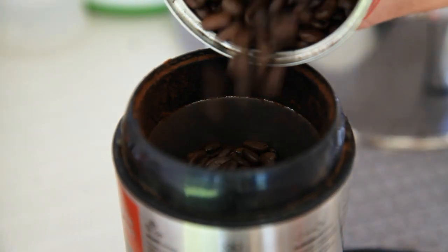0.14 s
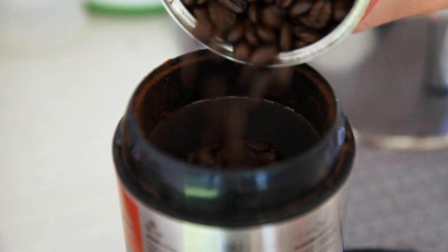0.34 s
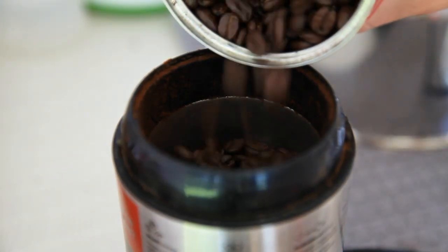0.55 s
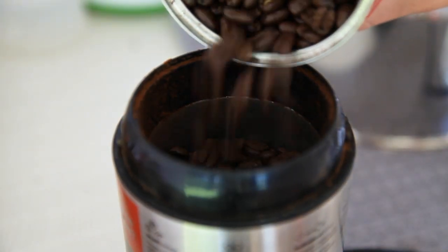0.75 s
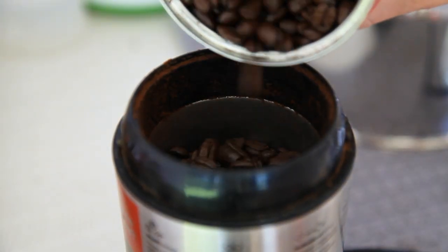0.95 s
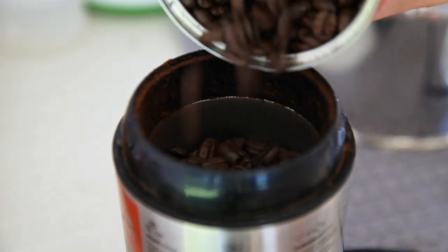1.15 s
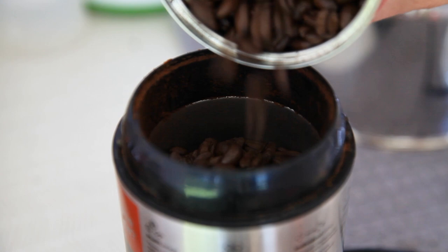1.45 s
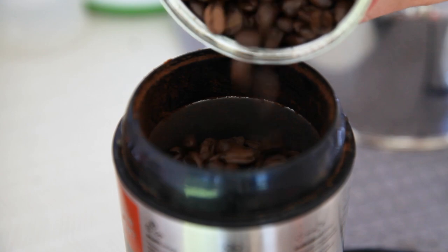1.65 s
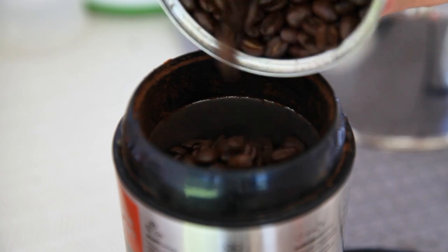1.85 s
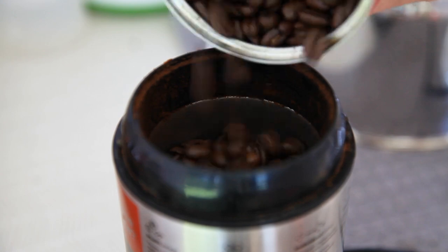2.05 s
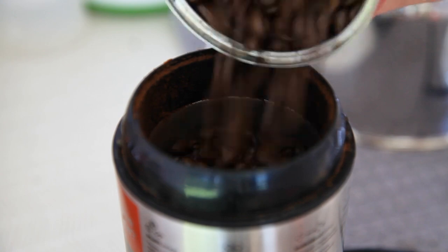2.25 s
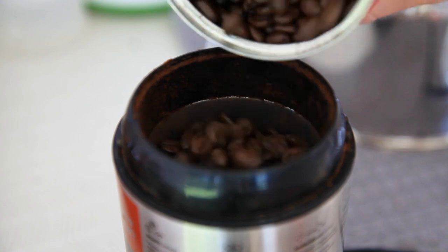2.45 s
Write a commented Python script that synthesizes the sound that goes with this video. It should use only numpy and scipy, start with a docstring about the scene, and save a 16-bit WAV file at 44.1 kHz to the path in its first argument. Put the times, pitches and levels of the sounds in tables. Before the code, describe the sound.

Close up in a quiet kitchen, coffee beans stream and bounce into a steel cup in uneven surges, with brief glassy scrapes, dull low bumps midway, and one tiny hollow knock near the end.

```python
"""Roasted coffee beans clack and rattle from a glass jar into a grinder's steel cup, close by in a kitchen.
Each bean is a noise crunch plus dying modes of its shell, the heap's hollow and the cup; shells tick.
Rough noise slides over the lip drive the jar's modes; random small impacts make the patter.
Midway come low thuds, decaying sines with puffs and rumble; later one small hollow knock.
Reflections follow the beans; a mains hum and faint room noise lie underneath."""
import sys
import numpy as np
from scipy import signal
from scipy.io import wavfile
from scipy.ndimage import uniform_filter1d

SR = 44100
rng = np.random.default_rng(int(sys.argv[2]) if len(sys.argv) > 2 else 0)


def output_pcm(signal):
    """Save a mono or channel-first signal as 16-bit PCM at the path in sys.argv[1].

    Samples are clipped to [-1, 1] before scaling.
    """
    pcm = np.clip(np.atleast_2d(signal).T, -1, 1) * 32767
    wavfile.write(sys.argv[1], SR, np.round(pcm).astype(np.int16))


N = 114660

# modes of the glass jar: freq_hz, relative_level_db, t60_s
JAR_MODES = [(2457, 0.5, 0.096), (2502, -7, 0.11), (3460, -7, 0.15), (5240, -7.5, 0.072),
             (7540, -2.5, 0.15), (9830, -5, 0.042)]
SHELL_HZ, TICK_HZ = (2650, 7550), (8200, 13500)  # ranges of bean and tick pitch
CONTACT_RISE_S = 0.00019
EDGE_HZ = 15900  # top of the recorded band


def landings():
    """Each loud bean grazes a neighbour, lands and bounces once, on both heap and cup."""
    # loud beans, before trims: start_s, heap_clack_level_db, cup_ring_level_db
    loud_beans = [(0.0408, -33.0, -50.0), (0.113, -33, -29.0), (0.1374, -29.5, -25), (0.146, -31.5, -25),
                  (0.1983, -31.5, -29), (0.2094, -28, -26), (0.2352, -31.5, -39), (0.407, -31.5, -26.5),
                  (0.4316, -27, -35.0), (0.4475, -30, -21.5), (0.4538, -30.5, -24), (0.5008, -30, -22.0),
                  (0.5256, -41, -30), (0.5444, -29.5, -48.0), (0.5801, -27, -49.0), (0.6271, -27, -19.5),
                  (0.723, -24.5, -45), (0.7515, -55, -30.5), (0.7572, -47, -32.5), (0.7785, -42, -35),
                  (0.7978, -34, -45.0), (0.8216, -40, -46.0), (0.8325, -26, -46), (0.864, -56, -34.0),
                  (0.8909, -38, -30.0), (0.8989, -36.5, -33), (0.9157, -31.5, -32), (0.9595, -49.5, -31),
                  (1.0203, -30.5, -26), (1.024, -49, -29.5), (1.0571, -43.0, -31), (1.0922, -37, -34),
                  (1.103, -35.5, -35.0), (1.1206, -37, -37.0), (1.1644, -33.5, -27.5), (1.1742, -26, -30),
                  (1.1772, -32, -27), (1.1945, -34, -40), (1.2021, -33, -36), (1.2282, -30, -26.5),
                  (1.271, -34.5, -27), (1.2945, -23.5, -26), (1.3236, -27.5, -24), (1.3501, -35, -30),
                  (1.3785, -32.5, -27), (1.4197, -34, -24), (1.452, -34, -36.0), (1.483, -29.5, -29),
                  (1.5165, -34.5, -30.5), (1.5365, -36, -29.5), (1.5508, -29, -45), (1.5577, -32.0, -22.5),
                  (1.6204, -32, -40.0), (1.6384, -38, -23.5), (1.647, -40, -27), (1.676, -31, -36),
                  (1.7473, -36.5, -59), (1.8337, -35, -32.5), (1.8726, -30, -30.5), (1.8914, -41, -30),
                  (1.9752, -33, -28), (1.9892, -31.5, -30.5), (2.0222, -30.5, -29), (2.1347, -33.5, -38),
                  (2.1397, -44, -26), (2.147, -32.0, -26), (2.2161, -27, -41), (2.249, -36.5, -22.5),
                  (2.2545, -48.0, -26), (2.2646, -34.5, -20), (2.281, -26, -28.0), (2.2958, -41.0, -30),
                  (2.307, -31.0, -27.0), (2.3178, -29, -41.0), (2.382, -33, -35), (2.4238, -30, -20.0),
                  (2.4267, -28.5, -25), (2.5444, -34.5, -58.0), (2.57, -43, -38)]
    clack_trim_db, cup_trim_db, decay_s = -2, -3.5, 0.0057
    graze_lead_s, graze_db = (0.002, 0.006), -17.5
    bounce_delay_s, bounce_db = (0.0027, 0.011), -10.5
    out = np.zeros(N)
    for start_s, clack_db, cup_db in loud_beans:
        graze = (-rng.uniform(*graze_lead_s), graze_db)
        bounce = (rng.uniform(*bounce_delay_s), bounce_db)
        for offset_s, db in [graze, (0, 0), bounce]:
            heap_hit = clack(decay_s, rng.uniform(*SHELL_HZ))
            add(out, start_s + offset_s, amp(clack_db + clack_trim_db + db) * heap_hit)
            add(out, start_s + offset_s, amp(cup_db + cup_trim_db + db) * ping())
    return out


def clack(decay_s, shell_hz):
    """One bean: a crunch, the brief resonances of its own shell and the answer of the hollow."""
    # contact spectrum: freq_hz, relative_density_db
    contact_spectrum = [(200, -9.5), (800, -33), (1200, -10.5), (1600, -19.5), (2200, -6.5), (2900, -1),
                        (4200, -2), (5300, 3), (7000, -0.5), (8500, 0), (10500, -12.5), (13300, -15),
                        (16000, -25.5)]
    # resonances of the hollow above the heap: freq_hz, relative_level_db, t60_s
    hollow_modes = [(3530, -4, 0.05), (5370, -2, 0.051), (6270, 2, 0.041)]
    shell_t60_s, overtone_db, scatter_db = 0.015, -9.5, -9
    shell_share, hollow_share = 0.35, 0.36
    shell_modes = [(shell_hz, 0, shell_t60_s)]
    for ratio in rng.uniform(0.703, 1.393, size=2):
        shell_modes.append((shell_hz * ratio, overtone_db, shell_t60_s))
    shell = unit(ring(shell_modes, detune=0, vary_db=8, size=1500), size=220)
    hollow = unit(ring(hollow_modes, detune=0.0073, vary_db=7, size=1500), size=220)
    crunch = unit(burst(decay_s, contact_spectrum, CONTACT_RISE_S, scatter_db), size=220)
    return unit(crunch + shell_share * shell + hollow_share * hollow, size=220)


def ping():
    """One bean on the steel cup: dying modes behind a soft contact rise."""
    # modes of the steel cup: freq_hz, relative_level_db, t60_s
    cup_modes = [(7846, 1.5, 0.045), (7460, -5.5, 0.016), (8010, 2.5, 0.012), (8110, -13.5, 0.065),
                 (8450, -6, 0.005)]
    steel = unit(ring(cup_modes, detune=0.0083, vary_db=2.5), size=220)
    return steel * (1 - np.exp(-seconds(size=6000) / CONTACT_RISE_S))


def burst(decay_s, spectrum, rise_s, scatter_db):
    """An uneven crunch of contact and its duller scatter inside the grinder's mouth."""
    lump_db, scatter_top_hz, scatter_decay_s = 1.5, 9800, 0.0083
    t = seconds(size=1500)
    lumps = amp(lump_db * unit(uniform_filter1d(rng.standard_normal(len(t)), size=24)))
    crunch = rng.standard_normal(len(t)) * lumps * np.exp(-t / decay_s)
    lowpass = signal.butter(2, scatter_top_hz, fs=SR)
    dull_noise = signal.lfilter(*lowpass, rng.standard_normal(len(t)))
    scatter = dull_noise * amp(scatter_db) * np.exp(-t / scatter_decay_s)
    return colour((1 - np.exp(-t / rise_s)) * (crunch + scatter), spectrum)


def ticks():
    """Sharp shell contacts between the landings."""
    # brittle shells glancing off each other, before trim: start_s, level_db
    glances = [(0.0278, -32.5), (0.0684, -28.5), (0.306, -28), (0.314, -25), (0.4656, -42), (0.6252, -28),
               (1.0338, -27.0), (1.0874, -30.5), (1.1201, -32), (1.134, -34.5), (1.2246, -29.5),
               (1.2617, -29.0), (1.2788, -28), (1.282, -28), (1.296, -43), (1.3116, -29), (1.6232, -29.5),
               (1.763, -41.5), (1.9068, -31), (2.02, -31), (2.058, -30), (2.0803, -32.5), (2.254, -23.5),
               (2.2963, -29.5), (2.382, -30), (2.3932, -28)]
    trim_db = -2
    out = np.zeros(N)
    for start_s, db in glances:
        add(out, start_s, amp(db + trim_db) * tick(rng.uniform(*TICK_HZ)))
    return out


def tick(hz):
    """Two brittle shells glance off each other and ring for an instant."""
    # contact spectrum: freq_hz, relative_density_db
    tick_spectrum = [(300, -46.5), (1200, -6.5), (3000, -4), (6000, 2), (10000, 4.5), (13500, 2),
                     (16000, -6)]
    shell_t60_s, shell_share = 0.0047, 0.44
    shell = unit(ring([(hz, 0, shell_t60_s)], detune=0, vary_db=0, size=1500), size=88)
    contact = unit(burst(0.00069, tick_spectrum, rise_s=0.00008, scatter_db=-9.5), size=88)
    return unit(contact + shell_share * shell, size=88)


def scrapes(load_detune=0.005):
    """Short rough slides drive the jar's modes; beans lying on the glass detune it each time."""
    # slides over the glass lip, before jar and grit trims: start_s, level_db
    slides = [(0.117, -40), (0.147, -44), (0.189, -42), (0.256, -41.5), (0.31, -39), (0.367, -45.5),
              (0.476, -46.5), (0.507, -57), (0.752, -47.5), (1.282, -39), (1.312, -46.5), (1.452, -44),
              (1.553, -43.5), (1.948, -41), (2.002, -39), (2.131, -43), (2.168, -42.5), (2.255, -39.5),
              (2.319, -43), (2.498, -44)]
    # grit spectrum: freq_hz, relative_density_db
    grit_spectrum = [(300, -79), (1800, -8), (3300, 15), (4300, -12), (5600, 3), (8000, 11.5), (11000, -6),
                     (16000, -19)]
    width_s, rise_s = 0.0063, 0.0017
    jar_trim_db, grit_trim_db = -3, -1.5
    out, t = np.zeros(N), seconds(size=5000)
    push = np.minimum(t / rise_s, 1) * np.exp(-(t / width_s) ** 2 / 2)
    for start_s, db in slides:
        slips = push * rng.standard_normal(len(t))
        glass = np.zeros(len(t))
        for mode in JAR_MODES:
            # same spread in Hz for every mode
            mode_ring = ring([mode], detune=load_detune * JAR_MODES[0][0] / mode[0], vary_db=0)
            driven = signal.fftconvolve(slips, mode_ring)[:len(t)]
            glass += amp(mode[1]) * unit(driven, size=700)
        grit = unit(colour(slips, grit_spectrum), size=700)
        add(out, start_s, amp(db) * (amp(jar_trim_db) * glass + amp(grit_trim_db) * grit))
    return out


def patter():
    """Jostling beans: random heap, cup, jar and shell impacts follow the stream's strength."""
    # stream strength, before layer trims: time_s, clatter_level_db, treble_level_db
    stream = [(0, -41.5, -42), (.1, -40.5, -54), (.21, -33.5, -44), (.46, -32.5, -39.5), (.6, -38.5, -47.5),
              (.81, -41, -45.5), (.95, -43.5, -56), (.985, -43.5, -64), (1.111, -42, -39.5),
              (1.15, -43.5, -54), (1.31, -46, -57), (1.4, -43.5, -48.5), (1.66, -41.5, -48.5),
              (1.81, -48.5, -54), (2.01, -53, -51), (2.1, -41.5, -46.5), (2.3, -39, -49),
              (2.46, -44, -60.5), (2.6, -59, -42)]
    heap_trim_db, cup_trim_db, shell_trim_db, jar_trim_db = -2.5, -6, 1.5, -11.5
    decay_s = 0.0011
    time_s, clatter_db, treble_db = np.transpose(stream)
    heap = shower(lambda: clack(decay_s, rng.uniform(*SHELL_HZ)), per_s=600, spread_db=5.5)
    cup = shower(ping, per_s=120, spread_db=7.5)
    shells = shower(lambda: tick(rng.uniform(*TICK_HZ)), per_s=300, spread_db=12)
    jar = shower(lambda: ring(JAR_MODES, detune=0.005, vary_db=8.0), per_s=110, spread_db=5, count=20)
    clatter = amp(heap_trim_db) * heap + amp(cup_trim_db) * cup + amp(jar_trim_db) * jar
    treble = amp(shell_trim_db) * shells
    return level(np.c_[time_s, clatter_db]) * clatter + level(np.c_[time_s, treble_db]) * treble


def shower(make, per_s, spread_db, count=120):
    """Many small impacts of random size at random moments, scaled to rms 1."""
    out, sounds = np.zeros(N), [make() for _ in range(count)]
    gain = amp(spread_db * np.minimum(rng.exponential(1, N), 2.5))
    for i in np.flatnonzero(rng.random(N) < per_s / SR):
        add(out, i / SR, gain[i] * sounds[i % count])
    return unit(out)


def bumps(t60_s=0.12, rise_s=0.0034):
    """Low decaying swings, each with a dull puff, amid a rumble of coloured noise."""
    # low bumps, before the soft rise: start_s, level_db, pitch_hz
    thuds = [(1.239, -32, 48.3), (1.267, -24, 62.4), (1.298, -21.5, 57), (1.398, -16, 59),
             (1.452, -30, 52.5), (1.581, -26.5, 44.6), (2.278, -39.5, 72)]
    # rumble around the bumps: time_s, rms_level_db
    rumble_curve = [(0, -71), (1.22, -63), (1.305, -26.5), (1.37, -42), (1.405, -27.5), (1.49, -44),
                    (1.6, -46), (1.75, -47.5), (1.84, -69)]
    # rumble spectrum: freq_hz, relative_density_db
    rumble_spectrum = [(20, 0.5), (60, -3.5), (120, -7.5), (260, -29.5), (1200, -63.5)]
    # puff spectrum: freq_hz, relative_density_db
    puff_spectrum = [(130, 5), (260, 8), (380, -9), (900, -61)]
    puff_db, puff_decay_s = -18, 0.017
    out = level(rumble_curve) * unit(colour(rng.standard_normal(N), rumble_spectrum, size=8192))
    t = seconds(size=12000)
    for start_s, db, hz in thuds:
        swing = -amp(-60 * t / t60_s) * np.sin(2 * np.pi * hz * t)
        puff_noise = unit(colour(rng.standard_normal(len(t)), puff_spectrum))
        puff = amp(puff_db) * np.exp(-t / puff_decay_s) * puff_noise
        add(out, start_s, amp(db) * (1 - np.exp(-t / rise_s)) * (swing + puff))
    return out


def knock():
    """One small hollow knock: a decaying sine whose pitch snaps down as it sounds."""
    start_s, level_db, t60_s, rise_s = 2.2703, -25.5, 0.019, 0.00055
    final_hz, drop_hz, drop_decay_s = 494, 505, 0.00074
    out, t = np.zeros(N), seconds(size=2000)
    hz = final_hz + drop_hz * np.exp(-t / drop_decay_s)
    envelope = amp(level_db - 60 * t / t60_s) * (1 - np.exp(-t / rise_s))
    add(out, start_s, envelope * np.sin(2 * np.pi * np.cumsum(hz) / SR))
    return out


def echoes(x, delay_s=0.003, size=22050):
    """Dense kitchen reflections: a noise tail, each band dying at its own speed."""
    # ring of the kitchen: freq_hz, t60_s
    room_t60 = [(2500, 0.33), (8000, 0.14), (13000, 0.22)]
    hz, t, bands = signal.stft(rng.standard_normal(size), SR, nperseg=128)
    decay = amp(-60 * t / read(room_t60, hz)[:, None])
    tail = signal.istft(bands * decay, SR, nperseg=128)[1]
    tail = tail * np.clip(seconds(len(tail)) / delay_s - 1, 0, 1)  # silent for delay_s, then fades in
    return signal.fftconvolve(x, tail / np.linalg.norm(tail))[:N]


def background():
    """Coloured room noise and a pure mains hum."""
    # room noise spectrum: freq_hz, relative_density_db
    air_spectrum = [(20, -2), (70, -3), (145, 5), (210, -7.5), (350, -6), (700, -13), (1500, -14),
                    (4000, -18), (16000, -44)]
    air_rms_db, hum_rms_db, hum_hz = -52.5, -60.5, 59.4
    air = unit(colour(rng.standard_normal(N), air_spectrum, size=8192))
    hum = np.sqrt(2) * np.sin(2 * np.pi * hum_hz * seconds(N))
    return amp(air_rms_db) * air + amp(hum_rms_db) * hum


def amp(db):
    """Decibels to gain."""
    return 10 ** (np.asarray(db) / 20)


def unit(x, size=None):
    """Scales to rms 1, taken over the first samples or over all."""
    return x / np.sqrt(np.mean(x[:size] ** 2) + 1e-20)


def read(points, hz):
    """Reads a curve on a log-frequency axis."""
    f, value = np.transpose(points)
    return np.interp(np.log(hz + 1), np.log(f + 1), value)


def level(points):
    """A dB curve as a gain for every sample."""
    return amp(np.interp(np.arange(N) / SR, *np.transpose(points)))


def seconds(size):
    """Time axis in seconds."""
    return np.arange(size) / SR


def add(mix, start_s, sound):
    """Mixes a sound in at a time, in place."""
    part = mix[max(round(start_s * SR), 0):][:len(sound)]
    part += sound[:len(part)]


def colour(x, points, size=2048):
    """Causal (minimum-phase) filter with the given spectrum."""
    log_gain = np.log(amp(read(points, abs(np.fft.fftfreq(size, 1 / SR)))))
    taps = np.fft.ifft(np.exp(np.conj(signal.hilbert(log_gain)))).real
    return signal.fftconvolve(x, taps[:size // 2])[:len(x)]


def ring(modes, detune, vary_db, size=6000):
    """Dying modes, varied at random in level, pitch and phase with each strike."""
    t, out = seconds(size), np.zeros(size)
    chance = rng.standard_normal((len(modes), 3))
    for (hz, db, t60_s), (louder, sharper, phase) in zip(modes, chance):
        envelope = amp(db + vary_db * louder - 60 * t / t60_s)
        out += envelope * np.sin(2 * np.pi * hz * (1 + detune * sharper) * t + phase)
    return out


def scene():
    """The pour in the kitchen; only the beans excite the reflections."""
    room_db = -10.5
    beans = landings() + ticks() + scrapes() + patter()
    room = amp(room_db) * echoes(beans)
    return (beans + room + bumps() + knock() + background())[None]


def record(dry):
    """The recorder's band limit: a linear-phase lowpass."""
    lowpass = signal.firwin(301, EDGE_HZ, window=("kaiser", 8), fs=SR)
    return signal.oaconvolve(dry, lowpass[None], "same")


dry = scene()
out = record(dry)
output_pcm(out)
```